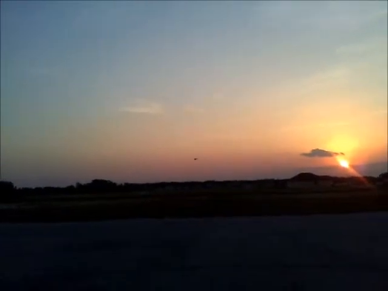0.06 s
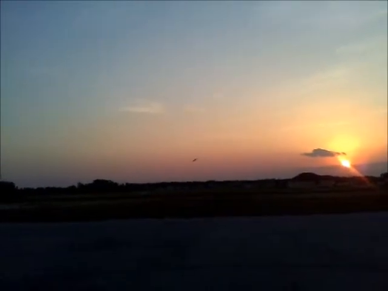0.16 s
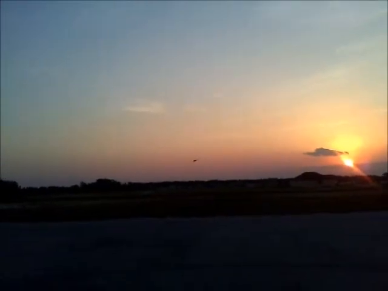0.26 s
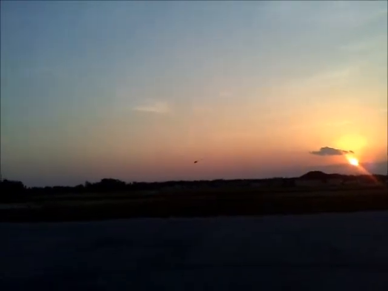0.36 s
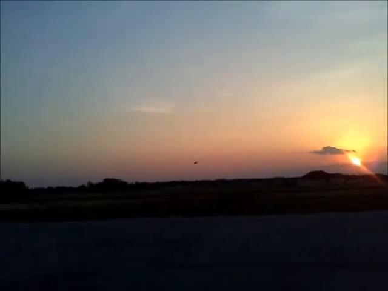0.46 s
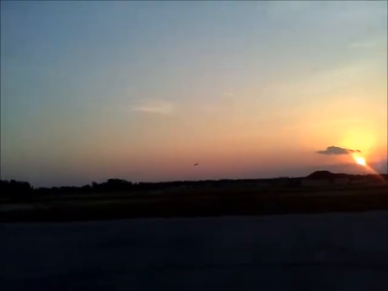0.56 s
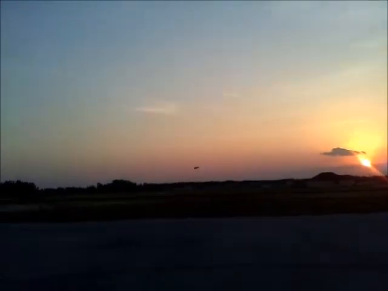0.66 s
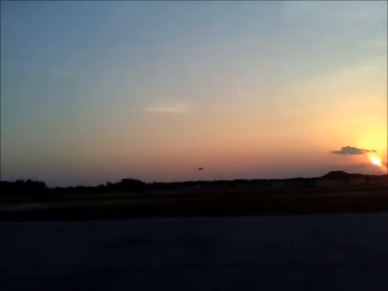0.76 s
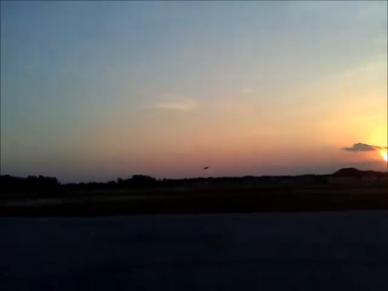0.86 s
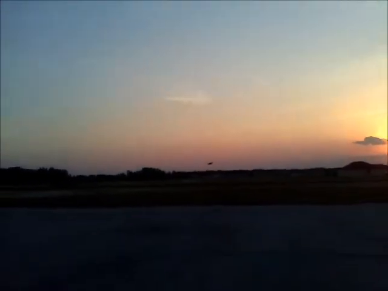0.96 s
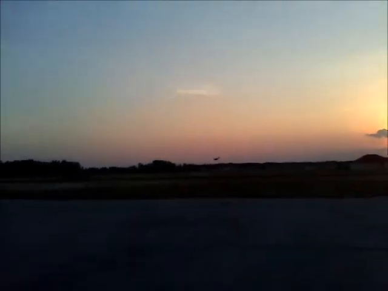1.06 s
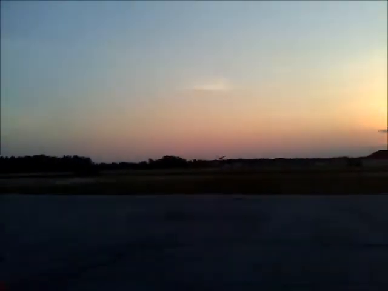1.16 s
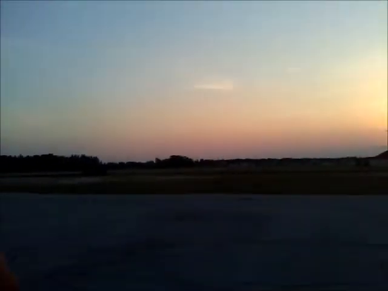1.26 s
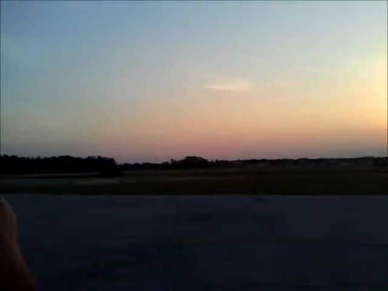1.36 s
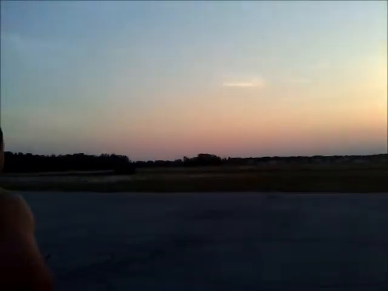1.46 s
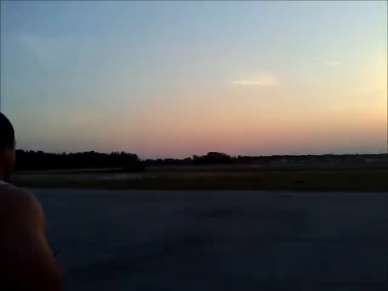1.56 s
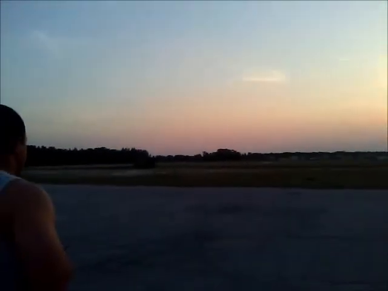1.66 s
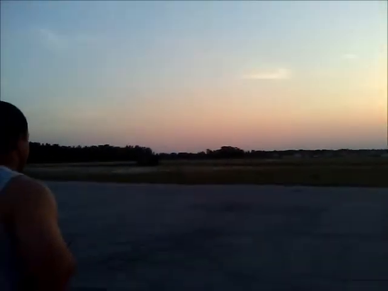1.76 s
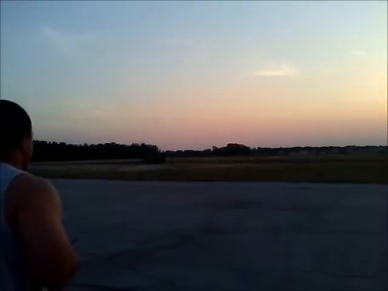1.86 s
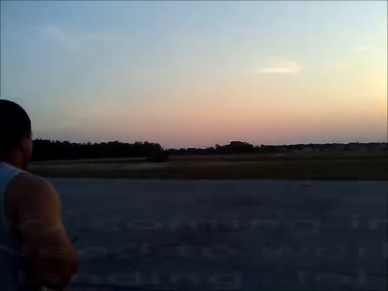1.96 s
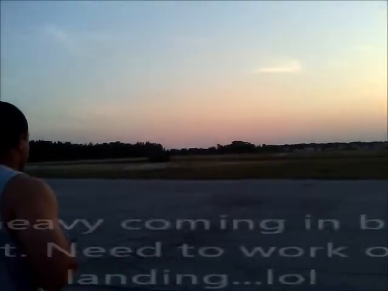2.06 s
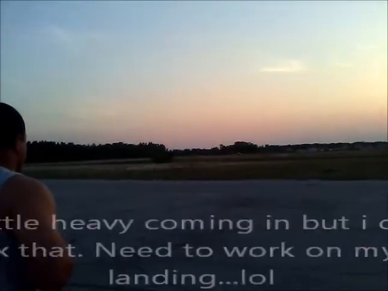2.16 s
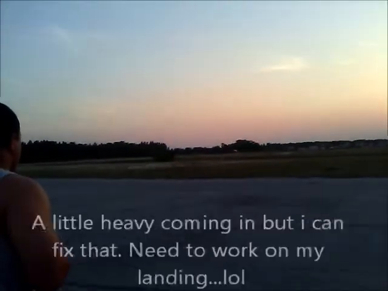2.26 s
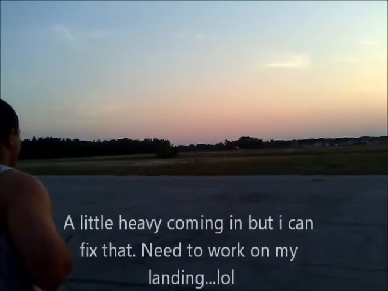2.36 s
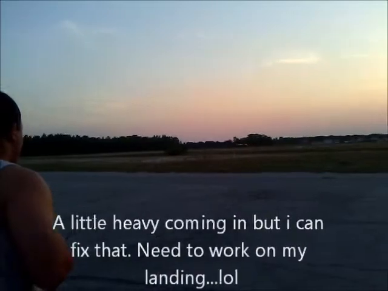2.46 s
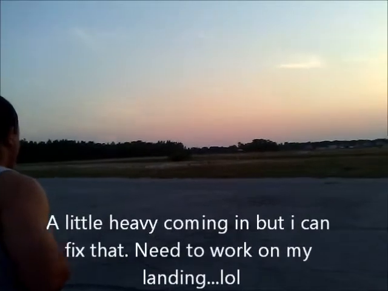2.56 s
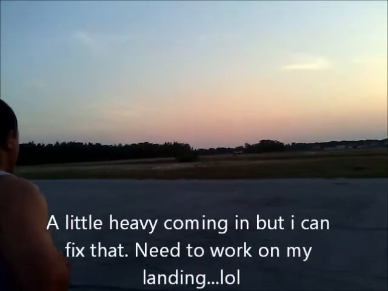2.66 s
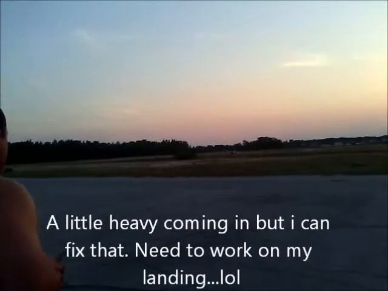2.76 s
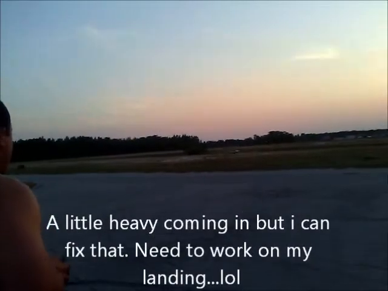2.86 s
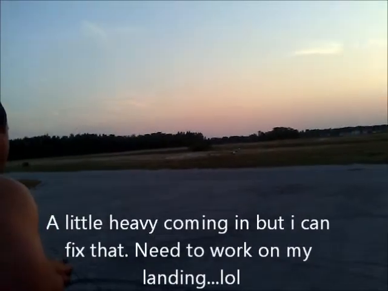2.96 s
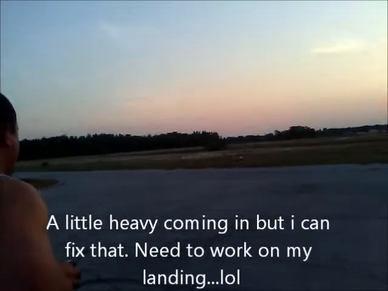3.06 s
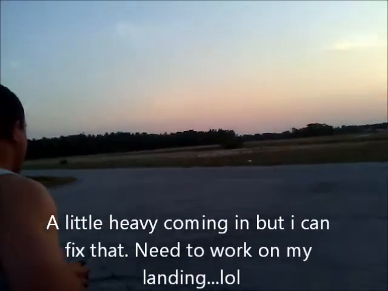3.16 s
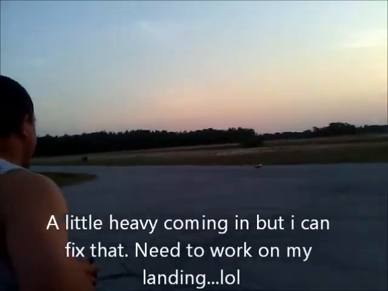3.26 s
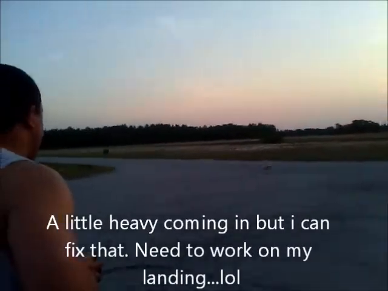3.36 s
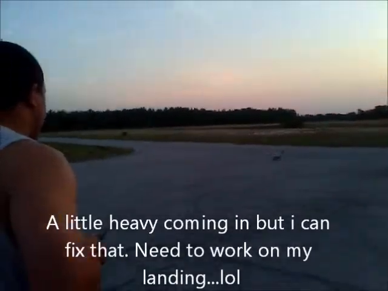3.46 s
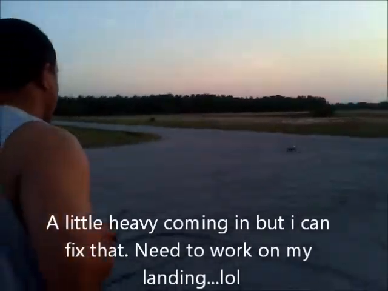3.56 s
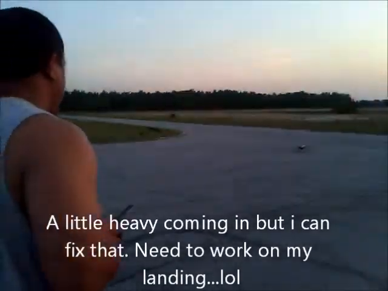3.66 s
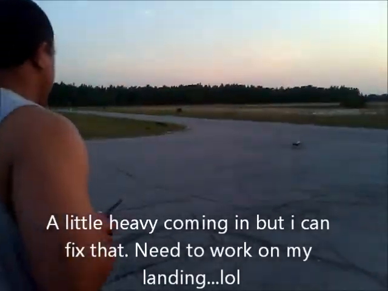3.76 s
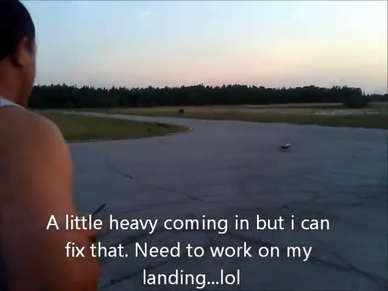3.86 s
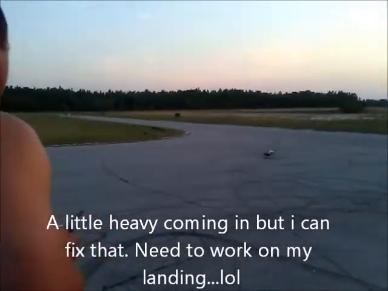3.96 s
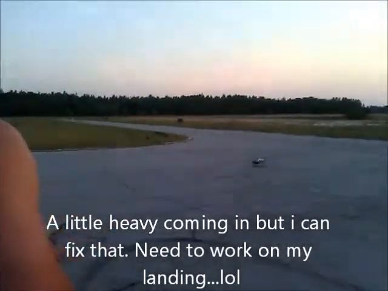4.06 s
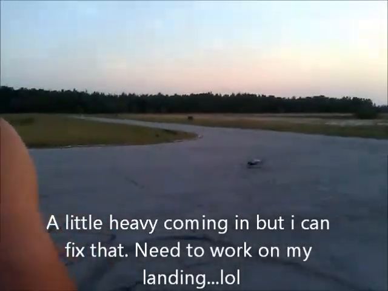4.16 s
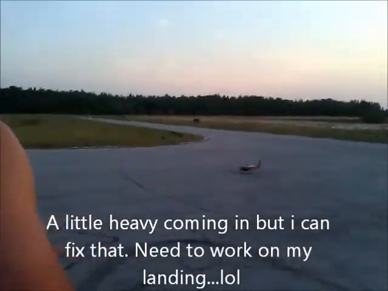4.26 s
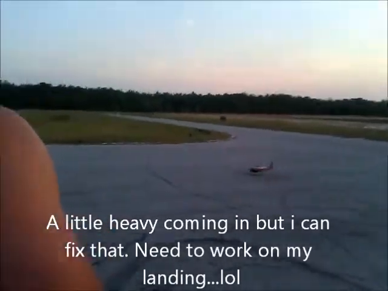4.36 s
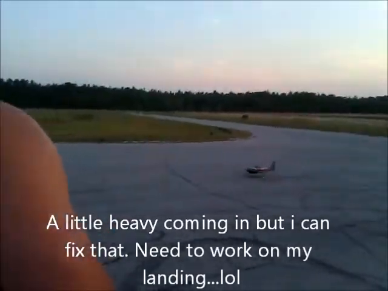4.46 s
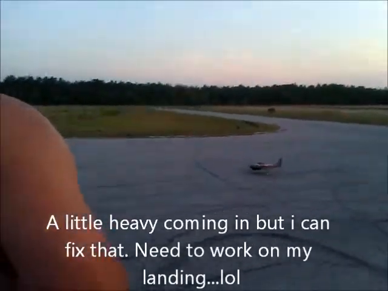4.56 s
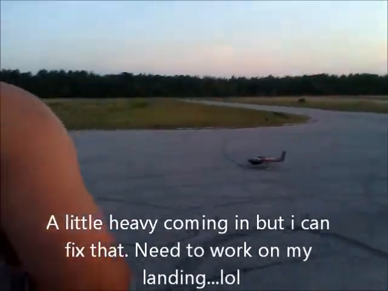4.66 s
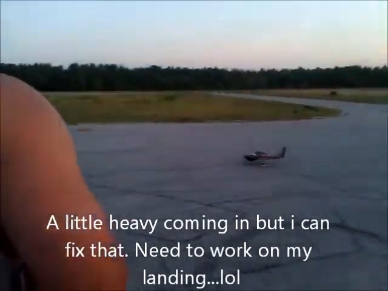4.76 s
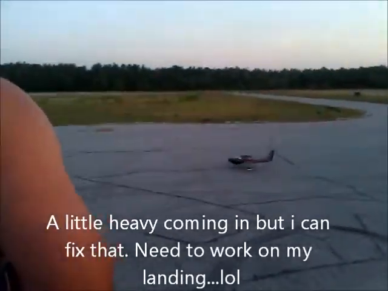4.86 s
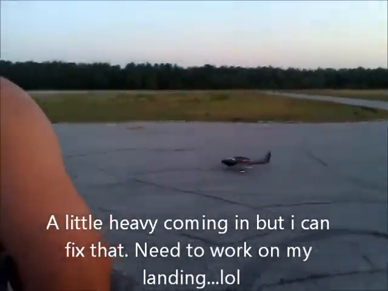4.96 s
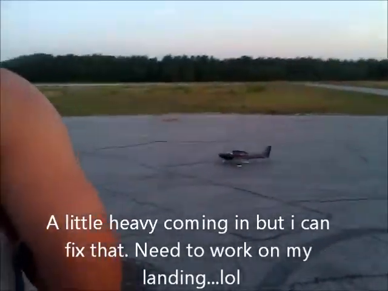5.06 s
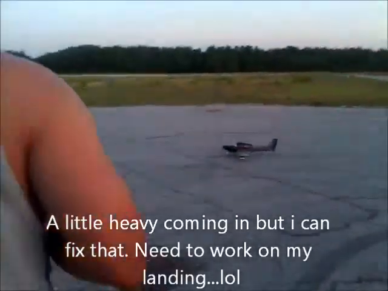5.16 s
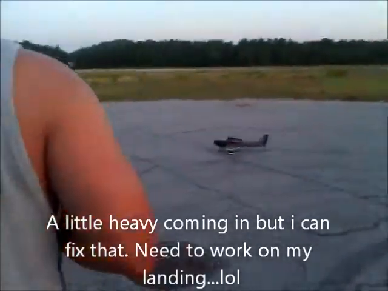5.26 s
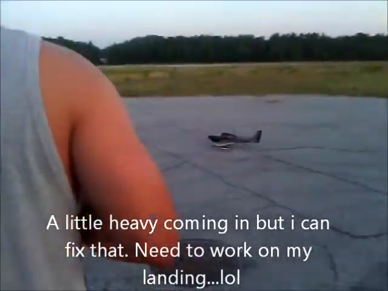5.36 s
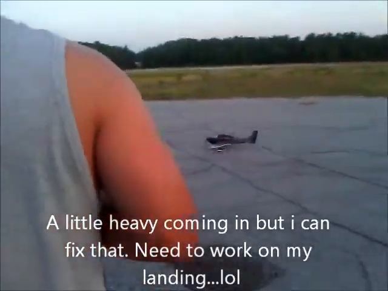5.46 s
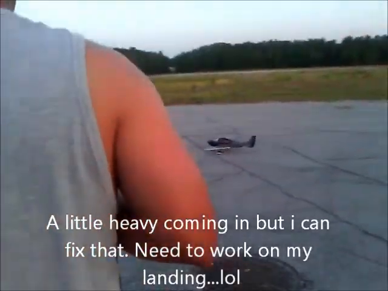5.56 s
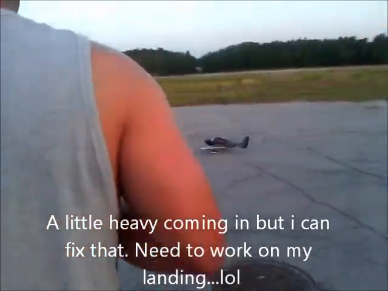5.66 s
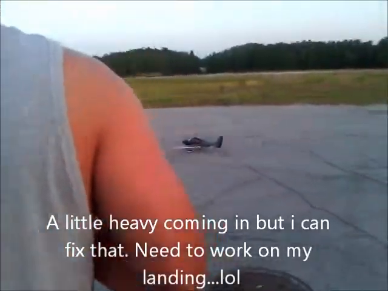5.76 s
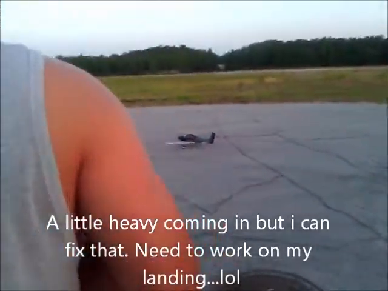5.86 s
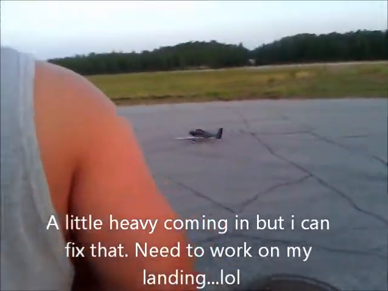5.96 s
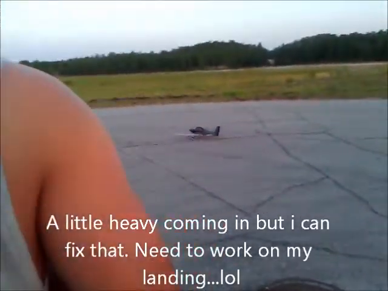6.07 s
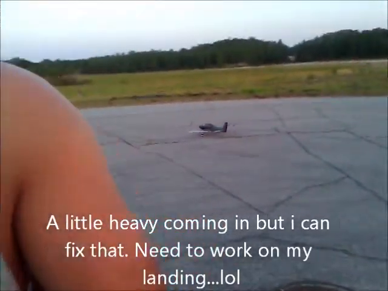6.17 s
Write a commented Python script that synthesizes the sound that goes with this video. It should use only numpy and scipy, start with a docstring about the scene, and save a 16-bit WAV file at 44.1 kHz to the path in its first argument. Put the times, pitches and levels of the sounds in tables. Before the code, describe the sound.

Still open air with soft hiss and a small bird peeping and whistling far off. Two quick dry clacks sound close by, with dull bumps on a hand-held microphone. Midway a sharp, bright crack breaks in, then irregular gritty scuffs, snaps, rattles and coarse rasps continue to the end, with brief low groans.

```python
"""A few dry clacks, then a sharp crack close by, followed by uneven gritty scuffs, rattles and scrapes,
perhaps handling or footsteps, with coarse rasps and short low groans. Random friction grains and clicks
drive banks of resonances; knocks ring as decaying sines. Now and then the small hand-held microphone is
bumped as it turns. Far off in the still evening a songbird whistles in gliding sines, over the shaped
noise of the air."""
import sys
import numpy as np
from scipy import signal
from scipy.fft import rfft, irfft
from scipy.io import wavfile
from scipy.ndimage import uniform_filter1d

SR = 44100
rng = np.random.default_rng(int(sys.argv[2]) if len(sys.argv) > 2 else 0)


def wav_out(sig):
    """Save sig, one row per channel (or a flat mono array), as 16-bit PCM at SR to the path in sys.argv[1]."""
    wavfile.write(sys.argv[1], SR, np.round(np.clip(np.atleast_2d(sig).T, -1, 1) * 32767).astype(np.int16))


N = 273861
TIME = np.arange(N) / SR  # seconds

# Steady scraping between the scuffs. Each row: time in seconds, drive level in dB before the shares below.
STEADY_SCRAPE = [(3.5, -51), (3.7, -55.5), (3.85, -53.5), (4.01, -58.5), (4.1, -49.5), (4.7, -45),
                 (4.87, -49), (4.95, -51), (5.25, -43), (5.34, -48), (5.48, -43.5), (5.54, -48.5),
                 (5.78, -48), (5.96, -51.5), (6.12, -45.5), (6.2, -50)]
# Loudest single snaps. Each row: time in seconds, height of the driving click in dB.
LOUD_SNAPS = [(3.5096, 2), (3.618, -26.5), (3.807, -26), (3.888, -18), (3.941, -15), (3.987, -23),
              (4.143, -13), (4.146, -17), (4.267, -15), (4.282, -11.5), (4.373, -16), (4.502, -12),
              (4.608, -13.5), (4.728, -12), (4.785, -15), (5.006, -16), (5.096, -16.5), (5.178, -14.5),
              (5.263, -16), (5.292, -18), (5.438, -11), (5.463, -15), (5.495, -20.5), (5.596, -19),
              (5.622, -19), (5.701, -21), (5.730, -7.5), (6.080, -12), (6.085, -13), (6.101, -20),
              (6.143, -20), (6.175, -22.5)]
# Drive of the hollow resonances by steady scraping and scuffs. Each row: time in seconds, gain in dB.
HOLLOW_GAIN = [(3.7, -4), (4.15, -2.5), (4.38, 1), (4.85, 4), (5.1, 2), (5.45, -1), (5.75, -1.5),
               (6.1, -3.5)]
# Broad resonances under scraping, from low to high.
# Each row: centre in Hz, width in Hz, relative level in dB.
RUMBLE_PEAKS = [(181, 260, -9.5), (272, 73, 0)]
HOLLOW_PEAKS = [(458, 72, 0.5), (598, 114, -3), (719, 73, 1.5), (1080, 176, -4)]
RASP_PEAKS = [(1050, 270, -5), (1618, 360, -2.5), (2055, 118, 3.5), (2460, 980, -7)]
GRIT_PEAKS = [(3150, 1620, -4), (3960, 430, 0.5), (4410, 390, -1.5), (4924, 143, 4.5), (5295, 400, 2.5),
              (5850, 520, 0), (6005, 170, 0), (6720, 430, -0.5), (7185, 120, 0)]
CRACKLE_PEAKS = [(3970, 570, -1), (4750, 330, 3), (5400, 400, -1.5), (6270, 260, -3.5), (6920, 160, -7)]
STEADY_START_S = 3.515
# shares of the steady drive in the hollow and rasping, gritty, crackling and rumbling parts
STEADY_LOW_DB, STEADY_FINE_DB, STEADY_COARSE_DB, STEADY_RUMBLE_DB = -5, -5.5, -7.5, -15
SNAP_RASP_DB = -12.5  # how hard a snap also strikes the rasping resonances


def scraping():
    """Forced resonance: friction grains and impacts drive broad resonances, each scratch reaching them all."""
    steady = level(STEADY_SCRAPE) * (TIME > STEADY_START_S)
    slip = scratches()
    snaps = clicks(LOUD_SNAPS)
    low_force, low_onset = contact(index=0)
    grit_force, grit_onset = contact(index=1)
    # independent forces add in power
    low_force = np.hypot(low_force, from_db(STEADY_LOW_DB) * steady)
    grit_force = np.hypot(grit_force, from_db(STEADY_FINE_DB) * steady)

    hollow = level(HOLLOW_GAIN) * (low_force * slip * grains(5000, 1.9) + low_onset) + crush(index=0)
    rasp = low_force * slip * grains(3500, 2.7) + low_onset + from_db(SNAP_RASP_DB) * snaps + crush(index=1)
    grit = grit_force * slip * grains(5000, 3.1) + grit_onset + snaps + crush(index=2)
    crackle = from_db(STEADY_COARSE_DB) * steady * slip * grains(1100, 3.8)
    rumble = from_db(STEADY_RUMBLE_DB) * steady * slip * grains(600, 3.8)
    return (resonate(rumble, RUMBLE_PEAKS, [80, 380], wander_db=1.5)
            + resonate(hollow, HOLLOW_PEAKS, [280, 1250], wander_db=2.5)
            + resonate(rasp, RASP_PEAKS, [1000, 2800], wander_db=2.0)
            + resonate(grit, GRIT_PEAKS, [2900, 8500], wander_db=2.0)
            + resonate(crackle, CRACKLE_PEAKS, [3600, 8500], wander_db=3.0))


# Close gritty scuffs that swell for a moment. Each row: time in seconds, hold in seconds,
# drive of the hollow and rasping parts in dB, drive of the gritty part in dB.
SWELLING_SCUFFS = [(3.482, 0.0048, -49, -36), (3.733, 0.027, -42.5, -38.5), (3.946, 0.0086, -48.5, -34),
                   (4.135, 0.01, -43, -37), (4.25, 0.027, -46.5, -37), (4.365, 0.017, -41, -35.5),
                   (4.499, 0.015, -42, -35), (4.536, 0.044, -49.5, -52), (4.748, 0.01, -45.5, -36.5),
                   (4.778, 0.019, -45.5, -38.5), (4.867, 0.0096, -55, -49.5), (5.152, 0.051, -44.5, -43.5),
                   (5.41, 0.016, -48, -36), (5.433, 0.0091, -33.5, -32), (5.599, 0.028, -51.5, -40.5),
                   (5.919, 0.0076, -53, -40.5), (6.076, 0.0059, -43.5, -39), (6.109, 0.029, -52, -52)]
# Scuffs that start abruptly. Each row: time in seconds, 60 dB decay in seconds,
# drive of the hollow and rasping parts in dB, drive of the gritty part in dB.
ABRUPT_SCUFFS = [(3.571, 0.24, -48, -47), (3.651, 0.24, -49, -41.5), (3.886, 0.21, -55.5, -43.5),
                 (4.043, 0.29, -52.5, -43.5), (4.238, 0.31, -51, -39.5), (4.606, 0.11, -41, -36),
                 (4.727, 0.25, -37, -32), (5.005, 0.21, -39.5, -34.5), (5.095, 0.13, -42.5, -43),
                 (5.261, 0.11, -54, -37), (5.36, 0.16, -58, -43.5), (5.730, 0.43, -49, -40),
                 (5.885, 0.19, -49, -41.5), (6, 0.4, -49.5, -42.5)]
SWELL_ATTACK_SHARE, SWELL_T60_S = 0.61, 0.088  # attack as a share of the hold: a longer scuff swells more slowly
ABRUPT_ATTACK_S, ONSET_DB = 0.00065, 15.5  # the onset is a click this far over the abrupt scuff


def contact(index):
    """Contact force: scuffs on the low (index 0) or gritty (1) part, and the impulse opening each abrupt one."""
    swelling = [(s, SWELL_ATTACK_SHARE * hold, hold, SWELL_T60_S, db[index]) for s, hold, *db in SWELLING_SCUFFS]
    abrupt = [(s, ABRUPT_ATTACK_S, 0, t60, db[index]) for s, t60, *db in ABRUPT_SCUFFS]
    onsets = clicks([(s, db[index] + ONSET_DB) for s, _, *db in ABRUPT_SCUFFS])
    return pressure(swelling + abrupt), onsets


SLIPS_PER_S, SLIP_FADE_S, SLIP_DB = 140, 0.002, 7


def scratches():
    """Stick and slip: at uneven moments the friction jumps and quickly fades; a gain of unit power."""
    slips = (rng.random(N) < SLIPS_PER_S / SR) * rng.random(N)
    fading = signal.lfilter([1], [1, -np.exp(-1 / (SLIP_FADE_S * SR))], slips + 1e-18)
    return rms_one(np.hypot(1, from_db(SLIP_DB) * np.sqrt(fading)))


# Hard knocks. Each row: time in seconds, rise in seconds, 60 dB decay in seconds, drive of the hollow,
# rasping and gritty resonances in dB, drive of the modal ring in dB, contact hardness as a low-pass in Hz.
HARD_KNOCKS = [(3.090, 0.00049, 0.2, -51, -55.5, -57.5, -49.5, 1500),
               (3.5098, 0.00012, 0.022, -46, -29, -21.5, -18.5, 6950),
               (3.513, 0.00057, 0.092, -28.5, -32.5, -29, -12, 900),
               (3.5514, 0.0015, 0.049, -46, -30, -29.5, -31, 6000)]


def crush(index):
    """Broadband excitation: a knock drives the hollow (index 0), rasping (1) or gritty (2) part evenly."""
    force = pressure([(s, rise, 0, t60, db[index]) for s, rise, t60, *db in HARD_KNOCKS])
    return force * rng.choice([-1, 1], N)


# Modes rung by a knock. Each row: frequency in Hz, relative level in dB, 60 dB decay in seconds.
KNOCK_MODES = [(235, -18.5, 0.046), (370, -16.5, 0.062), (552, -15.5, 0.05), (728, -7.5, 0.055),
               (986, -10, 0.048), (1120, -13.5, 0.054), (1330, -16.5, 0.053), (1770, -16, 0.045),
               (2410, -10.5, 0.034), (4380, -1.5, 0.026), (4770, 0, 0.035), (6100, 3, 0.035),
               (6400, 9, 0.023)]
# Single pitches that ring briefly within a knock.
# Each row: time in seconds, pitch in Hz, 60 dB decay in seconds, level of the ring in dB.
PITCHED_TOCKS = [(3.1035, 1243, 0.044, -37.5), (3.5515, 5960, 0.031, -20.5), (3.553, 1886, 0.045, -27)]


def knocks():
    """Modal ringing: a blow excites many modes, a soft contact only the low ones; a tock has a single pitch."""
    blows = 0
    for s, *_, ring_db, hard_hz in HARD_KNOCKS:
        blows = blows + cut(clicks([(s, ring_db)]), hard_hz, "low", order=1)
    modes = 0
    for k, (hz, db, t60) in enumerate(KNOCK_MODES):
        modes = modes + (-1) ** k * from_db(db) * ring(blows, hz, t60)
    tocks = sum(ring(clicks([(s, db)]), hz, t60) for s, hz, t60, db in PITCHED_TOCKS)
    return cut(modes + tocks, 190, "high")  # little bass


# Coarse mid-pitched rasps close by. Each row: time in seconds, hold in seconds, drive level in dB.
RASPING_CREAKS = [(4.585, 0.029, -40), (5.002, 0.01, -33.5), (5.027, 0.027, -39), (5.0925, 0.0048, -30.5),
                  (5.118, 0.063, -39), (5.176, 0.0027, -34), (5.22, .012, -36.5), (5.358, .004, -34.5),
                  (5.384, 0.052, -41), (5.7, 0.003, -40), (5.729, 0.0085, -43), (5.802, 0.0056, -43.5)]
# Their resonances. Each row: centre in Hz, width in Hz, relative level in dB.
CREAK_PEAKS = [(1280, 190, -3.5), (1600, 140, 0.5), (2074, 120, 0.5), (2700, 99, -9)]
CREAK_ATTACK_S, CREAK_T60_S = 0.0008, 0.097


def creak():
    """Stick and slip: coarse friction grains ring a few mid-pitched resonances."""
    force = pressure([(s, CREAK_ATTACK_S, hold, CREAK_T60_S, db) for s, hold, db in RASPING_CREAKS])
    return resonate(force * grains(1500, 1.2), CREAK_PEAKS, [1200, 2800], wander_db=2.5)


# Short low groans near 480 and 700 Hz, close by. Each row: time in seconds, pitch in Hz, level in dB.
LOW_GROANS = [(3.711, 704, -44), (4.364, 710, -38.5), (4.706, 484, -39.5), (4.718, 469, -37),
              (4.783, 489, -38), (4.835, 480, -36), (5.021, 474, -42), (5.436, 451, -36.5),
              (6.058, 633, -43)]
GROAN_ATTACK_S, GROAN_HOLD_S, GROAN_T60_S = 0.0036, 0.0088, 0.1
GROAN_WIDTH_HZ, GROAN_UPPER_RATIO, GROAN_UPPER_DB = 29, 1.47, -10.5


def groan():
    """Sustained resonance: friction grains keep a narrow low resonance singing, with a weaker one above it."""
    slips = grains(1100, 0.8)
    out = 0
    for s, hz, db in LOW_GROANS:
        force = pressure([(s, GROAN_ATTACK_S, GROAN_HOLD_S, GROAN_T60_S, db)])
        for centre, gain in ((hz, 1), (hz * GROAN_UPPER_RATIO, from_db(GROAN_UPPER_DB))):
            tone = signal.lfilter(*signal.iirpeak(centre, centre / GROAN_WIDTH_HZ, fs=SR), slips)
            local_power = np.abs(uniform_filter1d(tone ** 2, size=600))
            out = out + gain * force * tone / np.sqrt(local_power + 1e-9)  # an even tone
    return cut(out, [340, 900], "band", order=3)


# Dry clacks close by. Each row: time in seconds, drive in dB at the low, middle and high register.
DRY_CLACKS = [(1.386, -28, -33, -32), (1.4199, -27, -25, -34.5), (1.4397, -52, -48, -28.5),
              (1.618, -49, -54.5, -65), (2.085, -60, -56, -53), (2.678, -63, -56, -59),
              (2.852, -57, -49, -46)]
# Centres of those registers in Hz.
REGISTERS_HZ = [650, 1850, 5400]
# Modes of the clacks. Each row: frequency in Hz, relative level in dB, 60 dB decay in seconds.
DRY_MODES = [(480, -3, 0.017), (724, -2.5, 0.024), (1410, 2, 0.0054), (1837, -3, 0.019), (2120, -6.5, 0.02),
             (3200, 2.5, 0.0027), (6000, 5.5, 0.0013)]


def clacks():
    """Damped modes: a sharp, dry click rings a few of them, followed by a brief rattle."""
    hits = 0
    for k, (hz, mode_db, t60) in enumerate(DRY_MODES):
        blows = clicks([(s, mode_db + np.interp(hz, REGISTERS_HZ, db)) for s, *db in DRY_CLACKS])
        hits = hits + (-1) ** k * ring(blows, hz, t60)
    return cut(scatter(hits, delay=0.0023, t60=0.093, wet_db=-5.0), 290, "high")


# Bumps on the microphone. Each row: time in seconds, height of the driving click in dB.
MIC_BUMPS = [(1.583, -45), (1.600, -34), (1.795, -46), (1.809, -49), (3.514, -31.5), (4.020, -34),
             (4.033, -36.5), (4.072, -42), (4.516, -31.5), (4.722, -45), (5.204, -29), (5.426, -28.5),
             (6.005, -44)]
# Fingers shift on the housing. Each row: time in seconds, hold in seconds, drive level in dB.
FINGER_SHIFTS = [(1.543, 0.015, -74.5), (1.7, 0.069, -81.5)]


def bumps():
    """Damped oscillation: a bump swings the microphone's housing dully; shifting fingers add a run of small ones."""
    fumble = pressure([(s, 0.004, hold, 0.1, db) for s, hold, db in FINGER_SHIFTS]) * grains(600, 1.3)
    swing = ring(clicks(MIC_BUMPS), hz=245, t60=0.029) + from_db(6.5) * ring(fumble, hz=207, t60=0.016)
    return cut(cut(swing, 560, "low", order=3), 150, "high", order=1)


# Short falling peeps of a bird. Each row: time in seconds, level in dB.
BIRD_PEEPS = [(.153, -69), (.485, -76), (1.149, -61.5), (1.264, -66), (1.524, -65.5), (1.858, -70),
              (1.991, -63.5), (2.586, -60), (2.74, -61), (3.19, -66)]
# Steep downward chirps. Each row: time in seconds, level in dB.
BIRD_CHIRPS = [(2.001, -58), (2.199, -54.5)]


def bird():
    """Frequency glides: peeps, a low note, rising whistles, chirps and a trill, echo scattered by the trees."""
    peeps = whistle(BIRD_PEEPS, length=0.018, start_hz=3300, end_hz=2640, bend=0.48)
    low_note = whistle([(0.172, -66.5)], length=0.1, start_hz=1706, end_hz=1850, bend=0.94)
    long_rise = whistle([(1.612, -63.5)], length=0.156, start_hz=2880, end_hz=4150, bend=0.88)
    chirps = whistle(BIRD_CHIRPS, length=0.042, start_hz=7400, end_hz=3960, bend=0.88)
    trilled = whistle(trill(count=4), length=0.078, start_hz=2760, end_hz=5150, bend=1.75)
    short_rise = whistle([(2.728, -61)], length=0.052, start_hz=2850, end_hz=4620, bend=1.7)
    song = (peeps + low_note + long_rise * from_db(4.9 * drift(55)) + chirps + trilled
            + short_rise * from_db(4.5 * drift(900)))
    return scatter(song * from_db(3.5 * drift(330)), delay=0.011, t60=0.3, wet_db=-8)


TRILL_S, TRILL_PERIOD_S, TRILL_DB = 2.348, 0.0925, -61.5


def trill(count):
    """Periodic repetition: evenly spaced notes of equal strength, as (s, dB)."""
    return [(TRILL_S + k * TRILL_PERIOD_S, TRILL_DB) for k in range(count)]


WAVER_S, WAVERS_PER_S = 0.004, 1000  # pitch waver per rate of glide, and its turns per second


def whistle(notes, length, start_hz, end_hz, bend):
    """Frequency modulation: a glide wavers where it moves fast; a bend over 1 steepens it towards its end."""
    u, out = np.linspace(0, 1, int(length * SR)), np.zeros(N)
    for s, db in notes:
        hz = start_hz + (end_hz - start_hz) * u ** bend
        hz = hz + WAVER_S * np.gradient(hz) * SR * u * drift(WAVERS_PER_S)[:len(u)]
        swell = np.sqrt(np.abs(np.sin(np.pi * u)))
        out[round(s * SR):][:len(u)] += from_db(db) * swell * np.sin(2 * np.pi * np.cumsum(hz) / SR)
    return out


# Spectrum of still air and microphone hiss. Each row: frequency in Hz, relative level per Hz in dB.
AIR_SPECTRUM = [(18, -68.5), (30, -34.5), (141, -12), (173, -13.5), (287, -3.5), (445, -8), (909, -6),
                (1070, -8.5), (2390, -14.5), (3460, -20), (6150, -13.5), (7400, -22.5), (9620, -43),
                (16300, -120)]
# Swells of a thin high hiss that comes and goes. Each row: time in seconds, hold in seconds, level in dB.
HISS_SWELLS = [(0, 0.13, -62), (2.443, 0.0086, -57), (2.99, 0.016, -63)]
AIR_DB, HISS_FLOOR_DB = -64.5, -76


def air():
    """Filtered noise: the even hush of an open field, with a thin hiss on top."""
    hz, db = np.transpose(AIR_SPECTRUM)
    colour = from_db(np.interp(np.log(np.fft.rfftfreq(N, 1 / SR) + 1), np.log(hz), db))
    hush = rms_one(irfft(rfft(rng.standard_normal(N)) * colour, N)) * from_db(0.5 * drift(33))
    hiss_peaks = [(3230, 890, -7.0), (5200, 2400, -7.5), (6660, 1000, -2.5)]  # Hz, width Hz, dB
    hiss = resonate(rng.standard_normal(N), hiss_peaks, [2950, 7800], wander_db=1.3)
    swells = pressure([(s, 0.008, hold, 0.08, db) for s, hold, db in HISS_SWELLS])
    return from_db(AIR_DB) * hush + (from_db(HISS_FLOOR_DB) + swells) * hiss


def from_db(db):
    """Logarithmic level: decibels to gain."""
    return 10 ** (np.asarray(db) / 20)


def rms_one(x):
    """Normalisation: scale to unit power."""
    return x / np.sqrt(np.mean(x ** 2) + 1e-20)


def level(rows):
    """Envelope: gain over time from (s, dB) rows."""
    return from_db(np.interp(TIME, *np.transpose(rows)))


def cut(x, hz, kind, order=2):
    """Band limiting: a Butterworth filter."""
    return signal.sosfilt(signal.butter(order, hz, kind, fs=SR, output="sos"), x + 1e-18)


def clicks(rows):
    """Ideal impact: one impulse for each (s, dB) row."""
    out = np.zeros(N)
    for s, db in rows:
        out[round(s * SR)] += from_db(db)
    return out


def drift(rate):
    """Random modulation: smooth chance of spread 1 with the given turns per second."""
    knots = rng.standard_normal(8000)
    return rms_one(np.interp(TIME * rate, np.arange(len(knots)), knots))


def ring(x, hz, t60):
    """Damped oscillator: a unit click sets a sine ringing from height 1."""
    r, w = from_db(-60 / (t60 * SR)), 2 * np.pi * hz / SR
    return signal.lfilter([0, np.sin(w)], [1, -2 * r * np.cos(w), r * r], x + 1e-18)


def grains(per_s, spread_db):
    """Friction as shot noise: tiny impacts of uneven size; unit power."""
    sizes = from_db(spread_db * np.minimum(rng.exponential(1, N), 4)) * rng.choice([-1, 1], N)
    return rms_one((rng.random(N) < per_s / SR) * sizes)


def pressure(touches):
    """Power addition: (s, attack s, hold s, t60 s, dB) touches each swell, hold, then die away."""
    power = np.zeros(N)
    for s, attack, hold, t60, db in touches:
        near = slice(max(0, int((s - 3 * attack) * SR)), int((s + hold + t60) * SR))
        age = TIME[near] - s
        swell = np.exp(-(age / attack) ** 2)
        decay = from_db(-60 * np.maximum(age - hold, 0) / t60)
        power[near] += (from_db(db) * np.where(age < 0, swell, decay)) ** 2
    return np.sqrt(power)


def resonate(drive, peaks, band_hz, wander_db):
    """Parallel resonances of unit power gain: each takes a wandering share of the drive."""
    out, response = 0, 0
    for k, (hz, width, db) in enumerate(peaks):
        r = np.exp(-np.pi * width / SR)
        zeros = (-1) ** k * from_db(db) * (1 - r * r) * np.array([1, 0, -1])
        poles = [1, -2 * r * np.cos(2 * np.pi * hz / SR), r * r]
        response = response + signal.lfilter(zeros, poles, signal.unit_impulse(SR // 10))
        share = rms_one(from_db(wander_db * drift(32)))
        out = out + signal.lfilter(zeros, poles, drive + 1e-18) * share
    return cut(out, band_hz, "band", order=3) / np.linalg.norm(cut(response, band_hz, "band", order=3))


def scatter(x, delay, t60, wet_db):
    """Diffuse reflection: the sound followed by a dense, dying cloud of copies of itself."""
    cloud = rng.standard_normal(SR // 2) * pressure([(delay, delay / 3, 0, t60, 0)])[:SR // 2]
    return x + from_db(wet_db) * signal.fftconvolve(x, cloud / np.linalg.norm(cloud))[:N]


def scene():
    """Superposition: everything as it reaches the one microphone."""
    return (scraping() + knocks() + creak() + groan() + clacks() + bumps() + bird() + air())[None]


# Narrow resonances of the microphone's housing. Each row: centre in Hz, width in Hz, gain in dB.
HOUSING_PEAKS = [(2067, 33, 0.5), (2585, 350, 2), (6110, 60, 4)]


def housing(x):
    """Cavity resonance: the space round the microphone lifts narrow bands."""
    for hz, width, db in HOUSING_PEAKS:
        x = x + (from_db(db) - 1) * signal.lfilter(*signal.iirpeak(hz, hz / width, fs=SR), x)
    return x


BAND_HZ, CUTOFF_HZ = 7490, 13500


def record(dry):
    """Band limiting: the band is limited, with a very faint hiss and faint rectified overtones above it, and
    the top is cut."""
    band_filter = signal.ellip(8, 0.3, 34, BAND_HZ, fs=SR, output="sos")
    narrow = signal.sosfilt(band_filter, from_db(-2.5) * housing(dry))
    # a faint spill of rectified overtones above the band that follows the sound's level
    upper_overtones = from_db(-40.0) * cut(cut(np.abs(narrow), BAND_HZ, "high", order=6), 17000, "low")
    steady_hiss = from_db(-78.0) * cut(rng.standard_normal(N), [4000, 9000], "band")
    top_filter = signal.cheby2(12, 50, CUTOFF_HZ, fs=SR, output="sos")
    return signal.sosfilt(top_filter, narrow + upper_overtones + steady_hiss)


dry = scene()
out = record(dry)
wav_out(out)
```